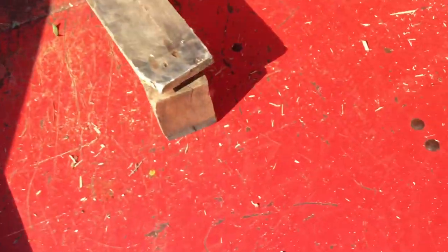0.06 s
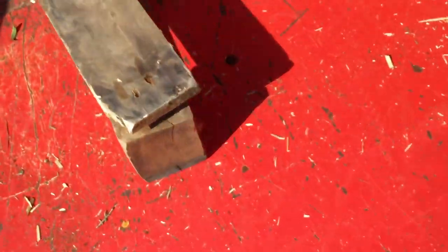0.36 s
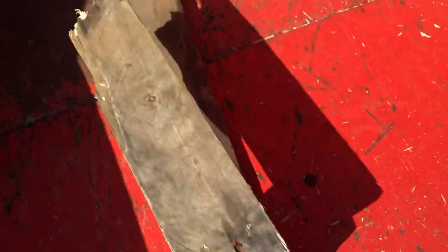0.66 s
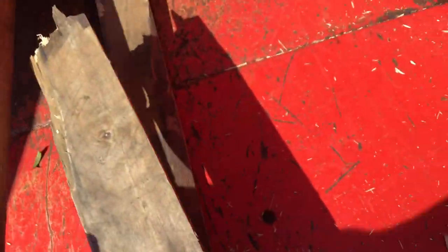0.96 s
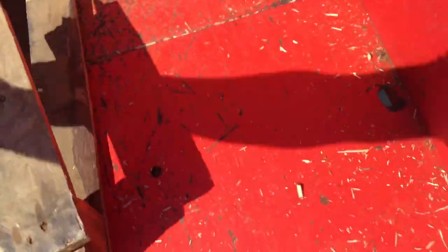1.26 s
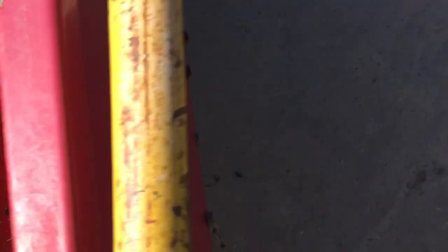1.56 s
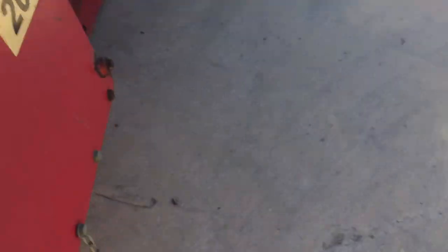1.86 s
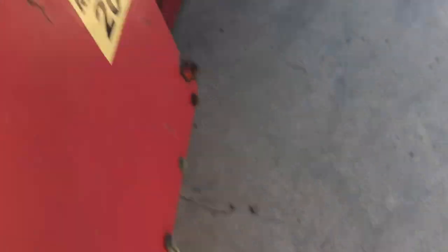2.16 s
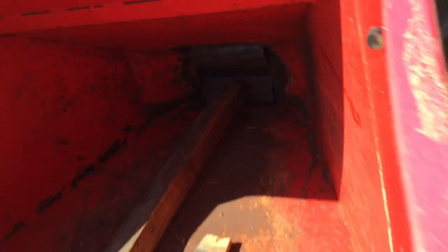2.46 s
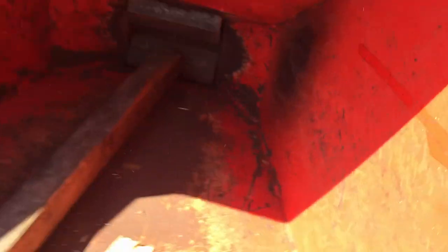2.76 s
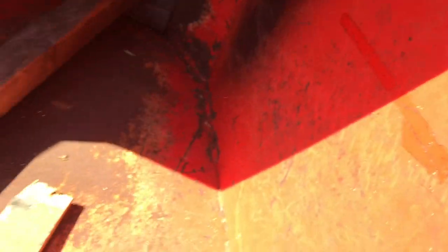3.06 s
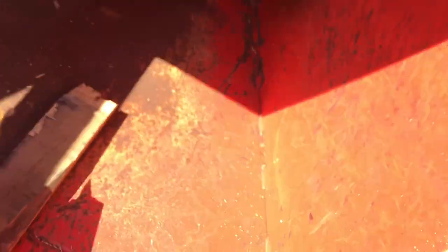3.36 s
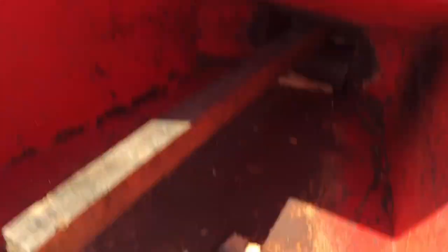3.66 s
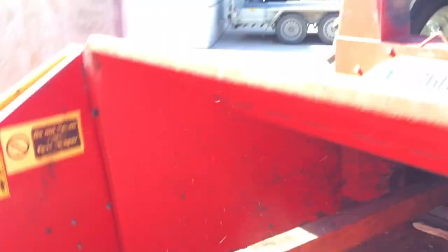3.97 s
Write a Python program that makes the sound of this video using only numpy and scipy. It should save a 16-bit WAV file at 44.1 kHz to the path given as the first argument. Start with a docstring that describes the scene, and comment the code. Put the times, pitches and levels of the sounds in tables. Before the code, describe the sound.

A wood chipper drones as a plank bumps along its metal hopper and the blades bite.

```python
"""A wood chipper's blades bite into a plank and chop it about twenty times a second, close by outdoors.
Before they catch it, near the end, the plank knocks, scrapes and splinters its way down the hopper
(the steel feed chute), making the walls and loose panels ring. The engine and the spinning cutter drum
drone over a rumble throughout, and air buffets the microphone once the cutting is under way."""
import sys
import numpy as np
from scipy import signal
from scipy.fft import rfft, irfft
from scipy.io import wavfile
from scipy.ndimage import uniform_filter1d

SR = 44100
rng = np.random.default_rng(int(sys.argv[2]) if len(sys.argv) > 2 else 0)


def file_out(sig):
    """Save sig as 16-bit WAV at sys.argv[1]."""
    # one column per channel
    cols = np.atleast_2d(sig).T
    # limit, then scale
    lim = np.clip(cols, -1, 1)
    pcm = np.round(lim * 32767).astype(np.int16)
    wavfile.write(sys.argv[1], SR, pcm)


N = 176400

# A "tone" table gives relative strength per Hz. A "ring time" is how long a note takes to fade 60 dB.
# blade chops (time [s], contact [s], cut [dB], splinter snap [dB], thud [dB], hollow ring [dB])
CHOPS = [(3.6802, 0.0027, -16, -23, -24, -17), (3.729, 0.0088, -15, -26.5, -20, -23),
         (3.779, 0.013, -12, -38, -24, -19.5), (3.832, 0.0045, -19, -29, -23, -29),
         (3.879, 0.011, -18, -15.5, -10.5, -19), (3.9362, 0.0028, -15.5, -25.5, -9, -23.5),
         (3.9879, 0.0043, -15, -24, -21, -36)]
# tone of a cut (frequency [Hz], level [dB])
CUT_TONE = [(100, 8.5), (350, -2), (660, 4.5), (900, 3), (1500, 4.5), (2800, 0.5), (4800, -4.5),
            (7000, -14.5), (15000, -24.5)]
# notes of the machine's body (frequency [Hz], level [dB], ring time [s])
BODY_NOTES = [(63.3, 2, 0.2), (124, 1.5, 0.088), (195.4, -1.5, 0.33), (338, -1.5, 0.26)]
# plank knocks (time [s], contact [s], pitch [Hz], wood [dB], splinter snap [dB], hopper ring [dB])
KNOCKS = [(1.0435, 0.0011, 5000, -45, -35.5, -34.5), (1.075, 0.002, 4200, -36.5, -39, -37),
          (1.087, 0.0025, 3500, -33, -35, -38), (1.0916, 0.003, 1000, -25.5, -29, -30.5),
          (1.3, 0.0035, 2320, -39, -49, -37), (1.3456, 0.00076, 3730, -22.5, -28, -29.5),
          (1.7167, 0.0032, 2300, -28, -53, -23), (2.172, 0.0076, 2360, -27.5, -32, -28),
          (2.417, .004, 3820, -50, -52, -41), (2.622, 0.0034, 2660, -21.5, -31.5, -21),
          (2.721, 0.0012, 1894, -25.5, -30.5, -38), (2.7242, 0.004, 2970, -26, -22, -21.5),
          (2.776, 0.0015, 5600, -26.5, -33, -23), (2.824, 0.0094, 2660, -31, -26.5, -22),
          (3.0251, 0.0018, 2300, -16.5, -27.5, -20), (3.066, 0.0084, 1950, -29, -24, -22),
          (3.175, 0.0048, 3130, -48, -23.5, -26), (3.185, 0.0043, 4250, -44, -23.5, -29),
          (3.207, 0.0034, 4540, -30, -32, -38), (3.222, 0.0038, 4700, -50, -34, -23),
          (3.327, 0.0043, 5570, -27.5, -25.5, -30), (3.33, 0.0058, 3440, -25, -25.5, -28),
          (3.668, .003, 4130, -42, -38, -35), (3.9556, 0.0015, 1570, -23.5, -38, -39)]
# notes of the plank (multiple of the pitch [ratio], level [dB], ring time [s])
PLANK_NOTES = [(.65, -5, .005), (.84, 2, 0.005), (1, 7, 0.0029), (1.14, 1.5, 0.0047), (1.42, -11.5, 0.0034)]
# tone of snapping wood (frequency [Hz], level [dB])
SNAP_TONE = [(300, -20), (1200, 12), (3000, 15.5), (6000, 13.5), (9000, 6), (12000, 3), (16000, -3)]
# clear notes of the steel hopper (frequency [Hz], level [dB], ring time [s])
HOPPER_NOTES = [(631, 16.5, 0.17), (929, 12, 0.31), (1070, 13, 0.13), (1207, 9, 0.19), (1470, -2, 0.37),
                (2160, 6, 0.16), (2570, 5, 0.33), (2840, 2, 0.15)]
# tone of the hopper's noisy clang (frequency [Hz], level [dB])
CLANG_TONE = [(150, -23), (350, 1), (660, 0.5), (1000, 0.5), (2500, -5), (5000, -10.5), (8000, -18.5),
              (15000, -36)]
# wood sliding on steel (time [s], length [s], rasp [dB], hiss [dB])
SCRAPES = [(0.7, 0.19, -54, -52), (0.85, 0.32, -49.5, -53), (1.255, 0.056, -44, -56),
           (1.357, 0.1, -40.5, -44.5), (1.47, 0.084, -50, -47.5), (2.182, 0.12, -41.5, -49.5),
           (2.83, 0.046, -34, -48), (2.859, 0.12, -30.5, -43.5), (3.05, 0.083, -35, -38),
           (3.151, 0.12, -46, -34.5), (3.323, 0.06, -33.5, -37), (3.447, .1, -30.5, -39.5),
           (3.561, 0.063, -32.5, -39.5), (3.745, 0.47, -40, -39.5), (3.905, 0.063, -27, -29.5)]
# tone of a scrape's rasp (frequency [Hz], level [dB])
RASP_TONE = [(400, 6), (1000, 5.5), (2600, 6.5), (5200, 2), (7500, -13), (15000, -82)]
# tone of a scrape's hiss (frequency [Hz], level [dB])
HISS_TONE = [(1500, -38), (4500, 5), (8000, -1), (12000, -8), (16000, -12)]
# bumps on a loose steel panel (time [s], pitch [Hz], level [dB], ring time [s])
PANEL_BUMPS = [(1.359, 990, -31, .08), (1.3958, 997, -23, 0.11), (1.689, 202, -16, 0.062),
               (1.721, 721, -24, 0.21), (1.721, 1172, -27, .12), (3.34, 2610, -30, .25),
               (3.58, 2570, -28, 0.14)]
# notes of a panel (multiple of the pitch [ratio], level [dB])
PANEL_NOTES = [(0.939, -3), (0.999, 2), (1.05, -7)]
# splinters catching and snapping (time [s], level [dB])
SPLINTERS = [(1.383, -42), (3.281, -37.5), (3.312, -46), (3.381, -35), (3.556, -39.5), (3.632, -36.5)]
# engine overtones (multiple of ENGINE_HZ [ratio], level [dB])
ENGINE_OVERTONES = [(3, -1.5), (5, -10), (6, 3), (8, -8), (10, -9), (14, -11.5), (20, -20)]
# drum overtones (multiple of DRUM_HZ [ratio], level [dB])
DRUM_OVERTONES = [(2, -13.5), (3, -7.5), (5, -14)]
# the drone as the listener moves round the machine (time [s], engine [dB], drum [dB])
DRONE_LEVELS = [(0, -32, -30.5), (.3, -24, -24.5), (1.0, -33, -23.5), (1.4, -26, -33), (1.7, -30.5, -46),
                (2.0, -31, -61), (2.45, -30, -29), (2.8, -26.5, -24.5), (3.25, -20.5, -27),
                (3.55, -25, -31), (4, -30, -39)]
# tone of the rumble before its bands get their own levels (frequency [Hz], level [dB])
RUMBLE_TONE = [(25, -33.5), (45, -25.5), (64, -4), (105, 2.5), (145, -4), (215, -5.5), (300, -11.5),
               (420, -13.5), (660, -14.5), (900, -24.5), (1500, -26.5), (3200, -37), (5200, -39.5),
               (7000, -48), (10000, -51), (15000, -60)]
# the rumble's four bands (time [s], bass [dB], low middle [dB], middle [dB], treble [dB])
RUMBLE_LEVELS = [(0, -25.5, -25, -32.5, -46.5), (.3, -34, -29, -33.5, -45), (.7, -25, -27.5, -35, -46),
                 (1.1, -22.5, -27, -35, -46), (1.42, -20.5, -25.5, -30, -44.5),
                 (1.62, -34, -27, -35.5, -48.5), (1.9, -31, -30.5, -35, -46),
                 (2.4, -35.5, -31.5, -36, -44.5), (2.65, -25, -30, -34, -42.5),
                 (3.0, -25, -28.5, -35, -39.5), (3.28, -20, -20.5, -32, -39.5),
                 (3.55, -29.5, -29.5, -37.5, -38), (3.75, -21.5, -24.5, -28, -37),
                 (4, -16.5, -25, -27.5, -25.5)]
# borders between those bands (frequency [Hz])
BAND_BORDERS_HZ = [142, 400, 1090]
# tone of buffeting air (frequency [Hz], level [dB])
GUST_TONE = [(15, -13), (35, 8), (70, 9), (200, -33), (800, -46)]

ENGINE_HZ, DRUM_HZ = 34.35, 39.1  # the engine's firing rate; twice the blade rate
AIR_HZ, AIR_RING_S = 686, 0.052  # the hollow note of the air in the hopper
HIT_SAMPLES = 16000


def chops(attack_s=0.0016, release_s=0.0038, walls_db=-6, thud_lag_s=0.003):
    """Each blade crushes through the wood, rings the hopper's walls and air, and jolts the machine."""
    out = np.zeros(N)
    thud = level_hit(ring(signal.unit_impulse(HIT_SAMPLES), BODY_NOTES))
    bite = np.minimum(np.arange(HIT_SAMPLES) / SR / attack_s, 1)
    for start, length, cut_db, snap_db, thud_db, hollow_db in CHOPS:
        force = bite * hit_force(length, release_s)
        tearing = bite * hit_force(length, release_s)
        cut = level_hit(colour(force, CUT_TONE)) + gain(walls_db) * hopper_walls(force)
        hollow = level_hit(ring(force, [(AIR_HZ, 0, AIR_RING_S)]))
        add(out, start, gain(cut_db) * cut + gain(snap_db) * snap(tearing) + gain(hollow_db) * hollow)
        add(out, start + thud_lag_s, gain(thud_db) * thud)
    return out


def knocks():
    """The plank hits the walls: a short wooden note, a snap of splinters and ringing steel."""
    out = np.zeros(N)
    for start, length, hz, wood_db, snap_db, steel_db in KNOCKS:
        force = hit_force(length, release_s=0.75 * length)
        wood = gain(wood_db) * level_hit(ring(force, PLANK_NOTES, hz))
        add(out, start, wood + gain(snap_db) * snap(force) + gain(steel_db) * hopper_walls(force))
    return out


def hit_force(length_s, release_s, touch_db=12, smooth_hz=500):
    """The push of one hit: a hard first touch, fibres being crushed, then letting go."""
    t = np.arange(HIT_SAMPLES) / SR
    crush = crackle(HIT_SAMPLES, grit=0.73) * np.exp(-np.maximum(t - length_s, 0) / release_s)
    force = crush + gain(touch_db) * signal.unit_impulse(HIT_SAMPLES)
    # even out the force so that low and high pitches are equally strong
    power = uniform_filter1d(np.abs(rfft(force)) ** 2, int(smooth_hz * HIT_SAMPLES / SR))
    hz = np.arange(len(power)) * SR / HIT_SAMPLES + 1
    return colour(force, np.c_[hz, -10 * np.log10(power)])


def snap(force):
    """Wood fibres break under a force with a bright crack."""
    return level_hit(colour(force, SNAP_TONE))


def hopper_walls(force, ring_s=0.23, notes_db=-8.5, dull_hz=5000):
    """Struck steel walls give a few clear notes inside a noisy clang that dulls as it fades."""
    t = np.arange(len(force)) / SR
    fade = np.exp(-np.log(1000) * t / ring_s)
    noise = rng.standard_normal(len(t))
    low = signal.sosfilt(signal.butter(2, dull_hz, fs=SR, output="sos"), noise)
    tail = low * fade + (noise - low) * fade ** 2  # the treble dies twice as fast
    clang = colour(signal.fftconvolve(force, tail)[:len(t)], CLANG_TONE)
    return level_hit(clang) + gain(notes_db) * level_hit(ring(force, HOPPER_NOTES))


def scrapes(grit=1.45, judder_db=-0.5, ring_db=-11, rise_s=0.019, fall_share=0.54):
    """The plank slides in shaky pushes: a rasp that sets the hopper ringing, and a gritty hiss."""
    t, out = np.arange(N) / SR, np.zeros(N)
    friction = crackle(N, grit) * gain(judder_db * drift(150))
    rasp = level(colour(friction, RASP_TONE))
    rasp = level(rasp + gain(ring_db) * level(ring(rasp, HOPPER_NOTES)))
    hiss = level(colour(crackle(N, grit), HISS_TONE))
    for start, length, rasp_db, hiss_db in SCRAPES:
        progress = (t - start) / length
        push = np.clip(np.minimum((t - start) / rise_s, (1 - progress) / fall_share), 0, 1)
        out += push * (gain(rasp_db) * rasp + gain(hiss_db) * hiss)
    return out


def panels(contact_s=0.0012):
    """A bumped steel panel rings with three notes close in pitch."""
    out = np.zeros(N)
    for start, hz, db, ring_s in PANEL_BUMPS:
        notes = [(ratio, note_db, ring_s) for ratio, note_db in PANEL_NOTES]
        add(out, start, gain(db) * level_hit(ring(hit_force(contact_s, contact_s), notes, hz)))
    return out


def splinters(contact_s=0.0025):
    """Single splinters catch and snap as the plank moves."""
    out = np.zeros(N)
    for start, db in SPLINTERS:
        add(out, start, gain(db) * snap(hit_force(contact_s, contact_s)))
    return out


def drone(hz, overtones, speed_waver=0.00772, waver_db=3):
    """A turning shaft hums at multiples of one rate, each wavering in pitch and loudness."""
    phase = 2 * np.pi * np.cumsum(hz * (1 + speed_waver * drift(7))) / SR
    out = np.zeros(N)
    for multiple, db in overtones:
        strength = gain(db + waver_db * drift(13))
        out += strength * np.sin(multiple * phase + 0.5 * drift(12) + 2 * np.pi * rng.random())
    return level(out)


def engine_and_drum():
    """The engine and cutter drum each drone, louder and softer as the listener moves around."""
    engine = gain_curve(DRONE_LEVELS, column=1) * drone(ENGINE_HZ, ENGINE_OVERTONES)
    drum = gain_curve(DRONE_LEVELS, column=2) * drone(DRUM_HZ, DRUM_OVERTONES)
    return engine + drum


def rumble(throb_depth=0.13, speed_waver=0.036):
    """The machine's broad noise throbs as the engine fires; four bands swell and fade separately."""
    firing = np.sin(2 * np.pi * np.cumsum(ENGINE_HZ * (1 + speed_waver * drift(7.86))) / SR)
    spectrum = rfft(colour(rng.standard_normal(N) * (1 + throb_depth * firing), RUMBLE_TONE))
    band = np.searchsorted(BAND_BORDERS_HZ, np.arange(len(spectrum)) * SR / N)
    out = np.zeros(N)
    for k in range(len(BAND_BORDERS_HZ) + 1):
        out += gain_curve(RUMBLE_LEVELS, column=k + 1) * level(irfft(spectrum * (band == k), N))
    return out


def gust(db=-29, start_s=3.85, rise_s=0.033):
    """Air buffets the microphone with a low flutter once the cutting is under way."""
    return gain(db) * level(colour(rng.standard_normal(N), GUST_TONE)) * fade_in(start_s, rise_s)


def hopper_air(db=-36.5, start_s=2.55, rise_s=0.1):
    """Machine noise rings the air in the hopper, heard once the listener leans over it."""
    hollow = level(ring(rng.standard_normal(N), [(AIR_HZ, 0, AIR_RING_S)]))
    return gain(db) * fade_in(start_s, rise_s) * hollow


def crackle(size, grit):
    """Dense, uneven clicks of wood fibres giving way; more grit makes them more uneven."""
    noise, strength = rng.standard_normal((2, size))
    return level(noise * np.exp(grit * np.minimum(strength, 2)))


def ring(x, notes, pitch=1):
    """Let x set off fading notes; each note's frequency is multiplied by pitch."""
    out = 0
    for k, (hz, db, ring_s) in enumerate(notes):
        pole = np.exp((2j * np.pi * hz * pitch - np.log(1000) / ring_s) / SR)
        out = out + (-1) ** k * gain(db) * signal.lfilter([1], [1, -pole], x).imag
    return out


def colour(x, tone, size=8192):
    """Filter a sound so that it takes on the shape of a tone table."""
    hz, db = np.array(tone).T
    gain_db = np.interp(np.log(np.arange(size // 2 + 1) * SR / size + 1), np.log(hz), db)
    # fold the filter forward in time so that nothing sounds before its cause
    cepstrum = irfft(np.log(gain(gain_db)))
    cepstrum[1:size // 2] *= 2
    cepstrum[size // 2 + 1:] = 0
    return signal.fftconvolve(x, irfft(np.exp(rfft(cepstrum))))[:len(x)]


def drift(rate_hz):
    """A smooth random wobble, roughly 1 either side of zero."""
    hold = int(SR / rate_hz)
    steps = np.repeat(rng.standard_normal(4000)[:N // hold + 1], hold)
    return 1.3 * uniform_filter1d(uniform_filter1d(steps, hold), hold)[:N]


def gain(db):
    """Turn decibels into a multiplier."""
    return 10 ** (np.asarray(db) / 20)


def gain_curve(table, column):
    """Glide through a table's levels, giving a multiplier for every sample."""
    rows = np.array(table)
    return gain(np.interp(np.arange(N) / SR, rows[:, 0], rows[:, column]))


def fade_in(start_s, rise_s):
    """Rise from 0 to 1 and stay there."""
    return np.clip((np.arange(N) / SR - start_s) / rise_s, 0, 1)


def level(x):
    """Scale a sound to an average power of 1."""
    return x / np.sqrt(np.mean(x ** 2) + 1e-20)


def level_hit(x):
    """Scale a hit to the energy of 10 ms of sound at power 1."""
    return x / np.sqrt(np.sum(x ** 2) * 100 / SR + 1e-20)


def add(out, start_s, x):
    """Mix a sound in at a given time."""
    i = int(start_s * SR)
    out[i:i + len(x)] += x[:max(N - i, 0)]


def scene():
    """Mix the running machine, the plank and the blades into one channel."""
    machine = engine_and_drum() + rumble() + hopper_air()
    return (machine + knocks() + panels() + chops() + scrapes() + splinters() + gust())[None]


def record(dry, low_cut_hz=37, dip_at_s=3.897, dip_length_s=0.027, dip_db=-8.5, ceiling=0.72, top_hz=16000):
    """The microphone thins the deepest bass; the level dips briefly after the hardest chop."""
    x = signal.sosfilt(signal.butter(3, low_cut_hz, "high", fs=SR, output="sos"), dry)
    since = np.arange(N) / SR - dip_at_s
    in_dip = 1.0 * ((since > 0) & (since < dip_length_s))
    x = x * gain(dip_db * uniform_filter1d(in_dip, size=160))
    x = x / (1 + (x / ceiling) ** 6) ** (1 / 6)  # round off the loudest peaks
    return signal.sosfilt(signal.ellip(10, .2, 80, top_hz, fs=SR, output="sos"), x)  # cut the top treble


dry = scene()
out = record(dry)
file_out(out)
```